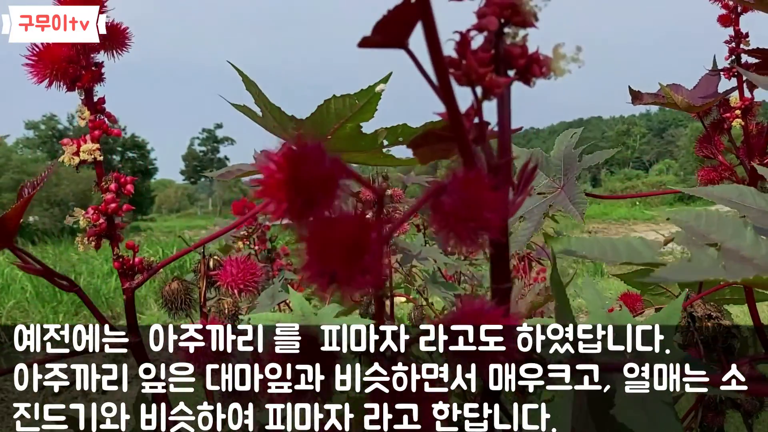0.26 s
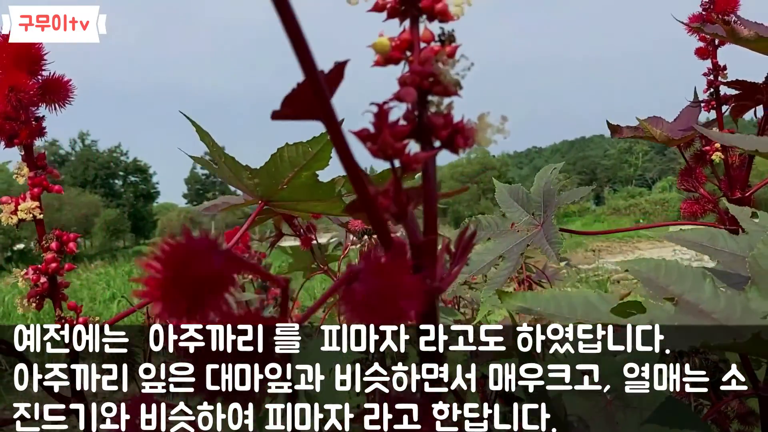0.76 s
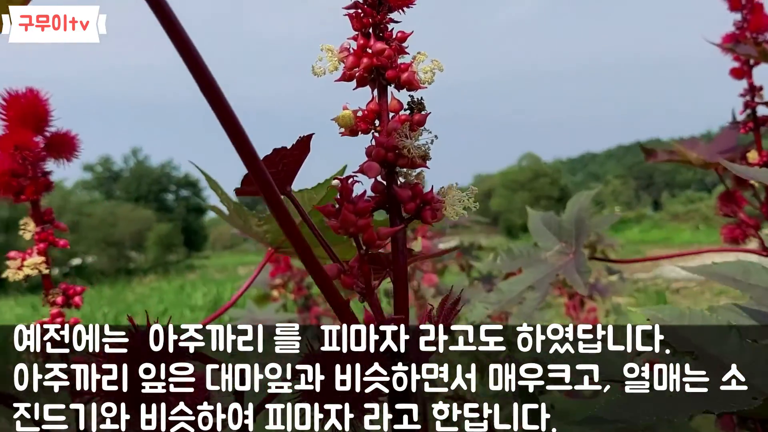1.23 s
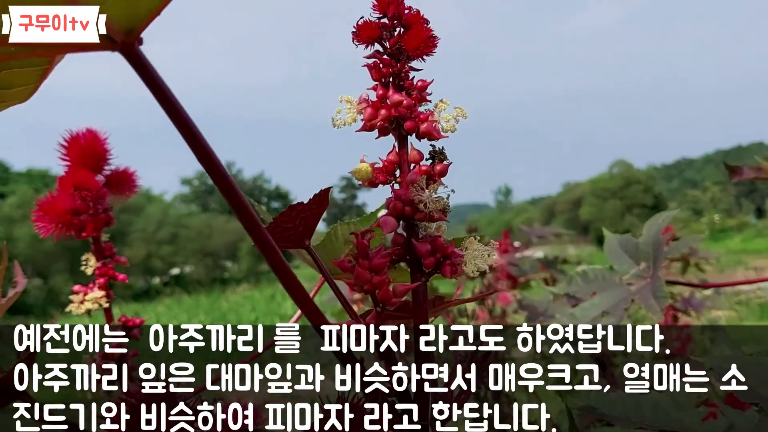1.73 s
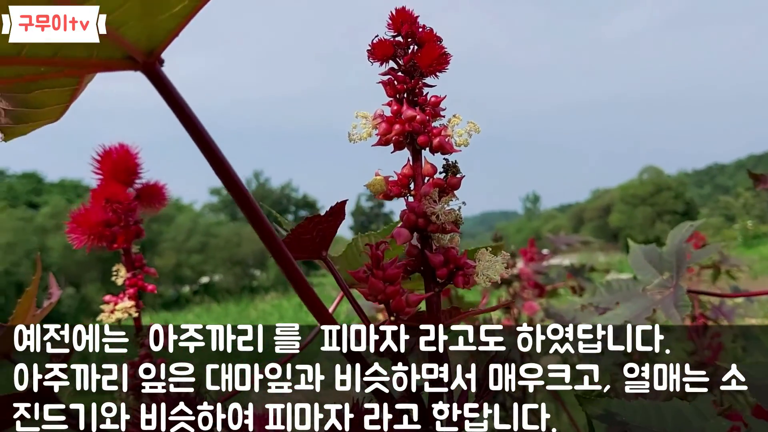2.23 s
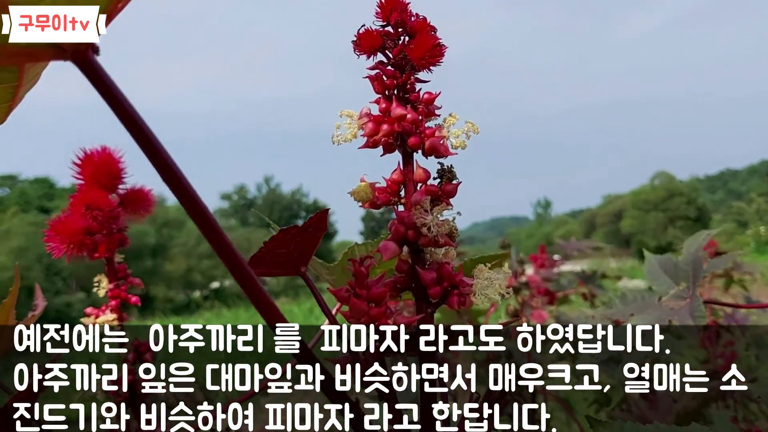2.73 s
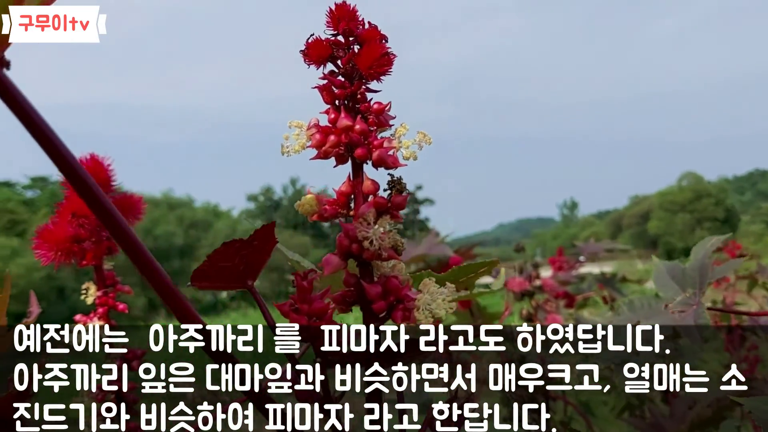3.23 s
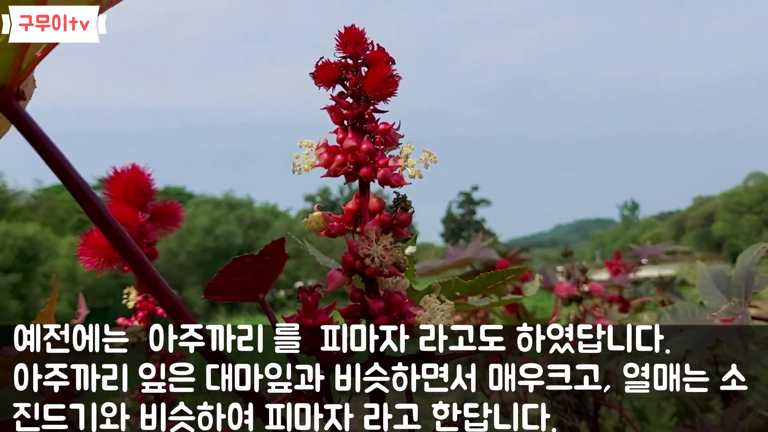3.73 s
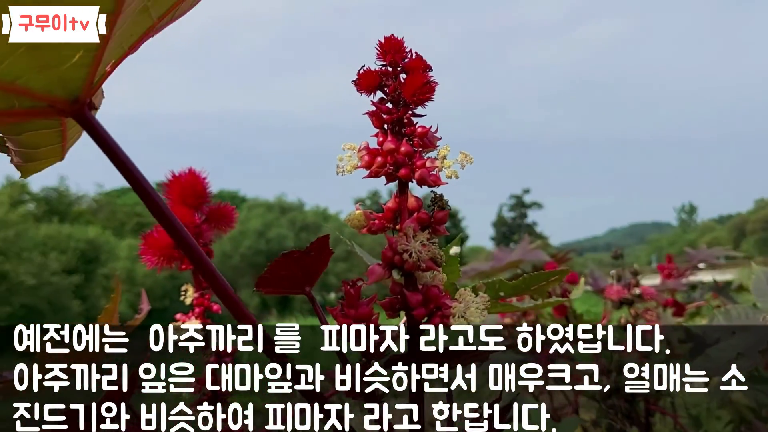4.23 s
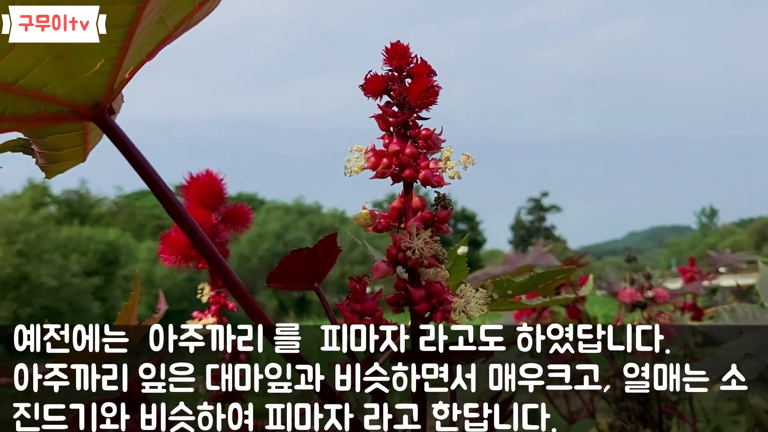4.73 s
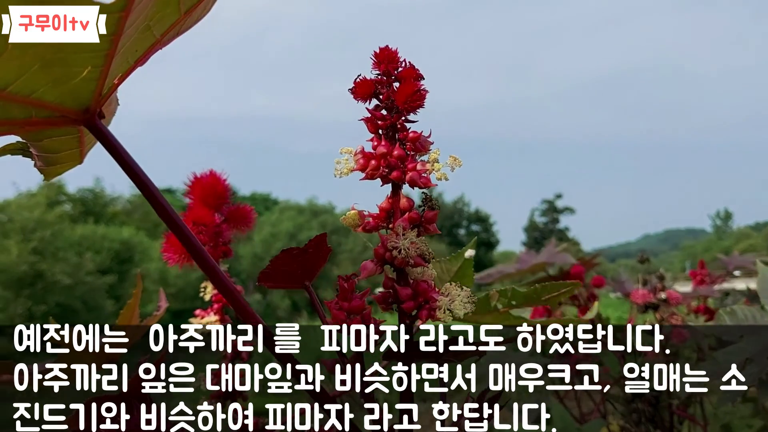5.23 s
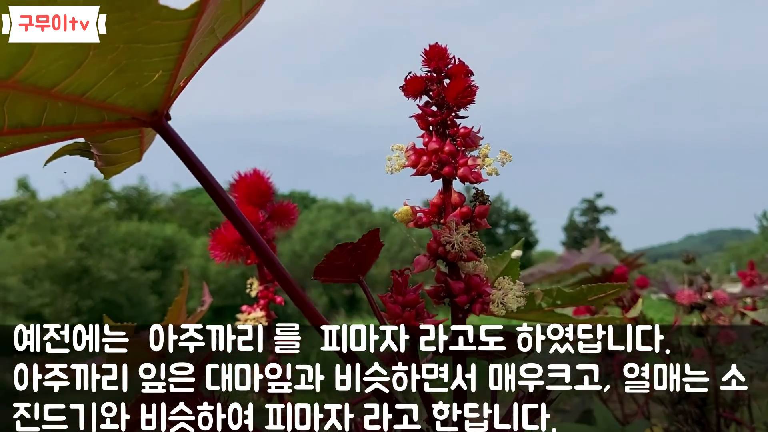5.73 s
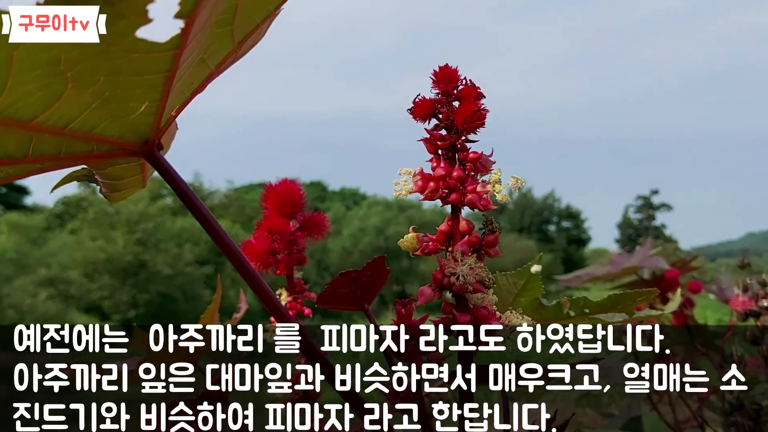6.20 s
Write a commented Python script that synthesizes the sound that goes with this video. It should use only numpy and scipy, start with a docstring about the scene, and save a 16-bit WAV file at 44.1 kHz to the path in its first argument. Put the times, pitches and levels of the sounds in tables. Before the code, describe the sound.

Shrill pulsing insects ring steadily outdoors; a nearby bird slurs thin whistles, rasps one arching screech, then mews nasally with a sharp chip.

```python
"""Songbird in a cricket field

A songbird in the trees gives a long arching screech, slurred whistles, nasal mews and one sharp chip.
Its harsh calls are harmonic series shaped by resonances; gliding tones make whistles and strong mew harmonics.
Crickets are pulsed tones over a blur of shaped noise; a lower trill and a high sizzle are modulated noise.
Behind them lie low-frequency air noise, a faint hum, soft bumps and swells of broadband hiss."""
import sys
import numpy as np
from scipy import signal
from scipy.fft import rfft, irfft, next_fast_len
from scipy.io import wavfile

SR = 44100
rng = np.random.default_rng(int(sys.argv[2]) if len(sys.argv) > 2 else 0)


def transcribe(u):
    """Save the signal u as a 16-bit wav file named by the first command-line argument.

    u: samples, shape (n,) or (channels, n), limited to [-1, 1]; the rate is SR.
    q: integer samples, one column per channel.
    """
    v = np.clip(np.atleast_2d(u).T, -1, 1)
    q = np.round(v * 32767).astype(np.int16)
    wavfile.write(sys.argv[1], SR, q)


N = 284886
TIME = np.arange(N) / SR
EDGE_HZ = 15720  # upper limit of the harmonics and of the final band


def amp(db):
    """Logarithmic level: decibels to amplitude gain."""
    return 10 ** (np.asarray(db) / 20)


def unit(x):
    """Normalisation: scales to rms 1."""
    return x / np.sqrt(np.mean(x ** 2) + 1e-20)


def along(rows, t, axis=1):
    """Linear interpolation: reads one column of a curve at times t."""
    rows = np.asarray(rows)
    return np.interp(t, rows[:, 0], rows[:, axis])


def colour(points, hz):
    """Spectral envelope: gain at hz, interpolated in log frequency and steep beyond its ends."""
    f, db = np.transpose(points)
    octaves = np.log2(hz + 1)
    beyond = abs(octaves - np.clip(octaves, np.log2(f[0]), np.log2(f[-1])))
    slope_db = 59  # per octave outside the curve
    return amp(np.interp(octaves, np.log2(f), db) - slope_db * beyond)


def noise(points):
    """Filtered noise: white noise takes on the given spectrum, at rms 1."""
    size = next_fast_len(N)
    spectrum = rfft(rng.standard_normal(size))
    gain = colour(points, np.fft.rfftfreq(size, 1 / SR))
    return unit(irfft(spectrum * gain, size)[:N])


def wander(rate_hz, size=N):
    """Low-pass noise: smooth chance of about rms 1 that moves up to about rate_hz."""
    padded = next_fast_len(max(size, SR))
    hz = np.fft.rfftfreq(padded, 1 / SR)
    spectrum = rfft(rng.standard_normal(padded)) * np.exp(-.5 * (hz / rate_hz) ** 2)
    return unit(irfft(spectrum, padded))[:size]


def phase(hz):
    """Frequency integration: the running phase of a pitch curve."""
    return 2 * np.pi * np.cumsum(hz) / SR


def add(mix, s, sound):
    """Superposition: mixes a sound in at time s."""
    part = mix[max(round(s * SR), 0):][:len(sound)]
    part += sound[:len(part)]


def slur(length, pitches):
    """Polynomial glide: progress 0-1, and a smooth curve through evenly spaced pitches."""
    u = np.linspace(0, 1, max(round(length * SR), 64))
    steps = np.linspace(0, 1, len(pitches))
    return u, np.polyval(np.polyfit(steps, pitches, len(pitches) - 1), u)


def voice(hz, throat, jitter, flutter, rough_hz, opening=1, count=20):
    """Source and filter: fluttering membrane harmonics; resonances rise as the bill opens."""
    turn = phase(hz * (1 + jitter * wander(rough_hz, len(hz))))
    shake = wander(rough_hz, 2 * len(hz))
    out = np.zeros(len(hz))
    for k in range(1, count + 1):
        strength = colour(throat, k * hz / opening) * (k * hz < EDGE_HZ)
        own_shake = np.roll(shake, rng.integers(len(shake)))[:len(hz)]
        out += strength * (1 + flutter * own_shake) * np.cos(k * turn + rng.uniform(0, 2 * np.pi))
    return unit(out)


def pure(hz, overtone_db=-22, waver=0.0061):
    """Near-sinusoidal oscillation: a slightly wavering tone with a weak octave."""
    turn = phase(hz * (1 + waver * wander(190, len(hz))))
    return unit(np.sin(turn) + amp(overtone_db) * np.sin(2 * turn))


# Resonances of the bird's throat and open bill: (f/Hz, relative level/dB)
THROAT = [(600, -11), (1000, -11), (1400, -15), (1900, -6.5), (2350, -3), (2900, -1), (3300, 4),
          (3620, 6.5), (3900, 0), (4300, -8.5), (5700, -12.5), (6700, -6.5), (7500, -6.5), (8600, -20),
          (11000, -27), (12500, -33)]
# Spectrum of the screech's breathy hiss: (f/Hz, relative level/dB)
SCREECH_HISS = [(1300, -27), (2200, -5), (4800, -5), (7000, 0), (8600, -17), (9300, 1), (11100, 8),
                (12500, -7), (15600, -10)]
# Spectrum of the shrill overtones: (f/Hz, relative level/dB)
SHRILL = [(5600, -25), (6400, 1.5), (6900, 2.5), (7500, -5.5), (8400, -24), (9600, -9), (11000, -11),
          (12200, -12), (14500, -31)]
SCREECH_START_S, SCREECH_END_S = 2.44, 3.3
SCREECH_ATTACK_S, SCREECH_RELEASE_S = 0.073, 0.14
# One arch of effort lifts pitch, voice and hiss together
ARCH_TOP_S, ARCH_HALF_S, ARCH_POWER = 2.82, .42, 1.3
SCREECH_LOW_HZ, SCREECH_TOP_HZ = 641, 939.6
# Levels at the top of the arch, and how much softer each part is at its foot
SCREECH_DB, SCREECH_SWELL_DB = -30, 6.5
HISS_DB, HISS_SWELL_DB = -38.5, 25.5
SHRILL_DB, SHRILL_SWELL_DB = -39, 17.5
FUNDAMENTAL_DB = -67  # the weak lowest partial
# The bill opens with effort and closes late, lowering the resonances (factors on the throat)
BILL_AJAR, BILL_SHUT, BILL_CLOSES_S, BILL_CLOSING_S = 0.9, 0.636, 3.095, 0.029


def screech(split=.03, upper_db=-1, grit_db=-12, bill_hz=1700):
    """Two detuned oscillators: the sides of the syrinx rasp apart in pitch, with effort-driven hiss."""
    t = np.arange(SCREECH_START_S, SCREECH_END_S, 1 / SR)
    arch = np.cos(np.pi / 2 * np.clip((t - ARCH_TOP_S) / ARCH_HALF_S, -1, 1)) ** ARCH_POWER
    hz = SCREECH_LOW_HZ + (SCREECH_TOP_HZ - SCREECH_LOW_HZ) * arch
    closing = .5 + .5 * np.tanh((t - BILL_CLOSES_S) / BILL_CLOSING_S / 2)
    opening = (BILL_AJAR + (1 - BILL_AJAR) * arch) * (1 - (1 - BILL_SHUT) * closing)

    lower = voice(hz * (1 - split), THROAT, jitter=.008, flutter=.6, rough_hz=90, opening=opening)
    upper = voice(hz * (1 + split), THROAT, jitter=.012, flutter=.6, rough_hz=90, opening=opening)
    rasp = lower + amp(upper_db) * upper + amp(grit_db) * noise(THROAT)[:len(t)]
    # so small a bill radiates little bass
    radiation = signal.butter(4, bill_hz, "highpass", fs=SR, output="sos")
    rasp = unit(signal.sosfilt(radiation, rasp))
    rasp = amp(SCREECH_DB - SCREECH_SWELL_DB * (1 - arch)) * rasp

    hiss = amp(HISS_DB - HISS_SWELL_DB * (1 - arch)) * noise(SCREECH_HISS)[:len(t)]
    shrill = voice(hz, SHRILL, jitter=.007, flutter=.8, rough_hz=60)
    shrill = amp(SHRILL_DB - SHRILL_SWELL_DB * (1 - arch)) * shrill
    fundamental = amp(FUNDAMENTAL_DB) * pure(hz, waver=.025)

    attack = np.minimum((t - t[0]) / SCREECH_ATTACK_S, 1)
    release = np.minimum((t[-1] - t) / SCREECH_RELEASE_S, 1) ** 2
    out = np.zeros(N)
    add(out, t[0], (rasp + shrill + hiss + fundamental) * attack * release)
    return out


NOTE_SWELL_DB = 7  # rise over each tone, beneath its fades


def swelling_tone(u, hz, db, flutter_db=2.5):
    """Amplitude envelope: one tone swells, flutters and fades at both ends."""
    swell = amp(NOTE_SWELL_DB * u + flutter_db * wander(50, len(u)))
    return amp(db) * unit(swell * signal.windows.tukey(len(u), .55) * pure(hz))


# Scooping whistles that dip and rise again: (start t/s, length t/s, pitch at mid-note f/Hz, level/dB)
SCOOPS = [(1.363, 0.2, 1830, -58), (4.333, 0.2, 1940, -52), (4.61, .169, 1967, -51.5),
          (6.171, 0.25, 1755, -61)]
# Scoop pitch at even steps: (factor on the mid-note pitch)
SCOOP_GLIDE = [1.2, 1.02, 1, 1.05, 1.23]
# Slurred whistles, one nearly level echoing tail after a note (at 1.55 s), and single strong
# harmonics that stand out of the mews: (start t/s, length t/s, from f/Hz, to f/Hz, level/dB)
GLIDES = [(0.648, 0.17, 1340, 1686, -58.5), (1.04, .177, 1260, 1620, -64.5), (1.066, .031, 3450, 2380, -55),
          (1.461, .095, 3270, 4290, -46), (1.497, .075, 1500, 2550, -56.5), (1.55, .07, 2400, 2390, -58.5),
          (2.261, .022, 2580, 1980, -55.5), (2.314, .062, 1950, 2130, -48.5),
          (3.56, 0.069, 1970, 2300, -62), (4.382, 0.103, 2750, 2650, -61.5), (4.457, .071, 1520, 2530, -56),
          (4.81, .11, 2770, 3340, -51), (5.102, .098, 1386, 1670, -64), (5.354, .087, 1340, 2060, -58),
          (5.561, .097, 1353, 1970, -64), (5.799, .09, 1420, 1930, -63), (6.3, .072, 3140, 3660, -51)]
GLIDE_POWER = 2  # above 1, the pitch moves mostly late in the tone
# One wavering note (start t/s, length t/s, level/dB), and its pitch at even steps (f/Hz)
WARBLE, WARBLE_HZ = (2.06, .113, -52.5), [3220, 2700, 2660, 2910, 3010, 2850, 2450]


def gliding_tones():
    """Frequency modulation: whistles, one warble, and single strong harmonics of the mews."""
    out = np.zeros(N)
    for start, length, middle_hz, db in SCOOPS:
        u, glide = slur(length, SCOOP_GLIDE)
        add(out, start, swelling_tone(u, middle_hz * glide, db))
    for start, length, from_hz, to_hz, db in GLIDES:
        u = np.linspace(0, 1, round(length * SR))
        hz = from_hz + (to_hz - from_hz) * u ** GLIDE_POWER
        add(out, start, swelling_tone(u, hz, db))
    start, length, db = WARBLE
    add(out, start, swelling_tone(*slur(length, WARBLE_HZ), db))
    return out


# The chip drops in, holds, flicks up and fades: (t/s, f/Hz, level/dB)
CHIP = [(5.45, 4070, -52), (5.46, 3264, -33), (5.467, 3210, -30.5), (5.473, 3370, -50),
        (5.486, 3330, -32.5), (5.499, 3320, -32), (5.507, 4150, -42), (5.513, 3410, -42),
        (5.522, 3390, -41), (5.55, 3360, -55)]


def chip():
    """Transient tone: pitch and level follow one brief, sharp contour."""
    t = np.arange(CHIP[0][0], CHIP[-1][0], 1 / SR)
    out = np.zeros(N)
    add(out, t[0], amp(along(CHIP, t, axis=2)) * pure(along(CHIP, t)))
    return out


# Nasal mews: (start t/s, length t/s, pitch f/Hz before the glide, level/dB)
MEWS = [(1.379, 0.26, 471, -53), (2.27, 0.24, 509.5, -50.5), (3.428, 0.24, 513, -65),
        (4.632, 0.36, 397, -49), (4.985, 0.26, 467, -50.5), (5.257, 0.27, 469, -52),
        (5.509, 0.2, 500.6, -51), (5.762, 0.18, 387, -52), (6.025, .221, 483, -54.5),
        (6.201, 0.3, 476, -56)]
# Spectrum of the mews: (f/Hz, relative level/dB)
MEW_COLOUR = [(700, -38), (1400, -3), (2000, 3), (2700, 5.5), (3400, 6.5), (4500, -10), (7000, -10),
              (9500, -16.5), (13000, -27.5), (15500, -24)]
# Mew pitch at start, middle and end: (factor on the pitch)
MEW_GLIDE = [0.95, 0.96, 1.39]


def mews(uneven_db=2, hoarse_db=-3, split=.07, second_db=-4):
    """Inharmonic roughness: two detuned voices and hoarse noise turn upward in pitch at the end."""
    out, rasp = np.zeros(N), noise(MEW_COLOUR)
    for start, length, hz, db in MEWS:
        u, glide = slur(length, MEW_GLIDE)
        pitch = hz * glide
        first = voice(pitch, MEW_COLOUR, jitter=.012, flutter=.8, rough_hz=25, count=30)
        second = voice(pitch * (1 + split), MEW_COLOUR, jitter=.02, flutter=.8, rough_hz=40, count=30)
        tone = unit(first + amp(second_db) * second)
        hoarse = amp(hoarse_db) * np.roll(rasp, -round(start * SR))[:len(u)]
        note = tone * amp(uneven_db * wander(25, len(u))) + hoarse
        add(out, start, amp(db) * unit(note * signal.windows.tukey(len(u), .7)))
    return out


def trees(x, wet_db=-9):
    """Multiple scattering: trunks and foliage return sparse, decaying echoes."""
    t, t60 = np.arange(SR // 2) / SR, .42  # decay time in s
    sparse = (rng.random(len(t)) < .05) * (t > .008)
    taps = rng.standard_normal(len(t)) * sparse * amp(-60 * t / t60)
    return x + amp(wet_db) * signal.fftconvolve(x, taps / np.linalg.norm(taps))[:N]


def cricket(hz, strokes, spread_hz=110, sweep_hz=120):
    """Stridulation: each wing stroke rings a tone that sags a little."""
    stroke = phase(strokes * (1 + .15 * wander(25.0)))
    tone = np.sin(phase(hz + spread_hz * wander(223.8) - sweep_hz * np.sin(stroke)))
    return unit(tone * (1 + np.cos(stroke)) ** 2)


def chirping(rate_hz, depth=0.58):
    """Amplitude modulation: wing strokes swell in loosely timed groups."""
    return 1 + depth * np.sin(phase(rate_hz * (1 + 0.155 * wander(1.77))))


# Spectrum of the blurred chorus: (f/Hz, relative level/dB per Hz)
CHORUS_COLOUR = [(3600, -32), (4150, -21), (4600, -9), (4850, -7), (5100, -9.5), (5450, -12), (5750, -15),
                 (6150, -20.5), (6320, -46)]
# Nearer crickets: (wing tone f/Hz, wing strokes f/Hz, chirps f/Hz, level/dB among themselves)
CRICKETS = [(4804, 70, 4.2, -17.5), (4793, 54, 7.5, -12.5), (5084, 73, 6.9, -8.5), (5665, 28, 16, -15),
            (6070, 36, 15, -32.5)]
# The nearest two keep regular time: (middle of first chirp t/s, period t/s)
CLOCKS = [(.056, .1433), (.13, .1641)]
# Their voices: (wing tone f/Hz, wing strokes f/Hz, level/dB relative to the blur)
LEADS = [(4926, 71, -9), (4740, 55, -10)]
CHORUS_DB, CHORUS_DRIFT_DB = -38.5, 0.71


def chorus(near_db=-6):
    """Incoherent summation: hundreds blur into noise, a few stand out and the nearest two beat time."""
    near = 0
    for hz, strokes, chirps, db in CRICKETS:
        near = near + amp(db) * cricket(hz, strokes) * chirping(chirps)
    leads = 0
    for (first, period), (hz, strokes, db) in zip(CLOCKS, LEADS):
        beat = np.cos(np.pi * (TIME - first) / period) ** 4
        leads = leads + amp(db) * unit(cricket(hz, strokes) * beat)
    blur = unit(noise(CHORUS_COLOUR) * amp(0.77 * wander(60)))
    level = amp(CHORUS_DB + CHORUS_DRIFT_DB * wander(0.48))
    return level * unit(blur + amp(near_db) * unit(near) + leads)


# Spectrum of a lower cricket's trill: (f/Hz, relative level/dB per Hz)
TRILL_COLOUR = [(2800, -42), (3150, -2), (3350, 1), (3600, 8.5), (3850, 4.5), (4150, -13), (4600, -47)]
TRILL_FIRST_S, TRILL_PERIOD_S = .06, .3135  # middle of the first burst, and even spacing
TRILL_DB, TRILL_REST_DB = -50, -6.5  # at the top of a burst, and between bursts relative to it


def trill(strokes_hz=48, depth=0.25, uneven_db=1.3):
    """Nested amplitude modulation: narrow noise pulses within evenly spaced bursts."""
    burst = np.cos(np.pi * (TIME - TRILL_FIRST_S) / TRILL_PERIOD_S) ** 2
    level = TRILL_DB + TRILL_REST_DB * (1 - burst) ** 2 + uneven_db * wander(4)
    pulses = 1 + depth * np.sin(phase(strokes_hz * (1 + 0.179 * wander(11.8))))
    return amp(level) * unit(noise(TRILL_COLOUR) * pulses)


# Spectrum of the bush crickets' sizzle: (f/Hz, relative level/dB per Hz)
SIZZLE = [(5800, -13), (6700, -19.5), (7300, -6.5), (7800, 1.5), (8200, -3), (8700, -18), (9550, -12),
          (10300, -20.5), (11300, -21.5), (12600, -29.5), (15800, -32.5)]
SIZZLE_DB = -52


def sizzle(flicker_db=1.05, swell_db=1.96):
    """Modulated noise: the fine, quick scraping of bush crickets flickers and slowly swells."""
    level_db = flicker_db * wander(160) + swell_db * wander(1.07)
    return amp(SIZZLE_DB) * unit(noise(SIZZLE) * amp(level_db))


# Spectrum of the soft hiss: (f/Hz, relative level/dB per Hz)
HAZE_COLOUR = [(900, -46), (1900, -13), (2550, 2), (3300, 2), (6000, -3), (11000, -16), (15500, -30)]
# Its swells, some a diffuse haze around the bird's calls: (middle t/s, half length t/s, level/dB there)
HAZE_SWELLS = [(.33, 0.34, -48), (1.85, 0.29, -62), (2.8, 0.57, -49.5), (5.5, 0.25, -50),
               (6.25, 0.45, -54.5)]
HAZE_REST_DB = -77


def haze():
    """Noise under an envelope: soft broadband hiss swells in bell shapes over a faint rest level."""
    swell = amp(HAZE_REST_DB)
    for s, half, db in HAZE_SWELLS:
        swell = swell + amp(db) * np.exp(-((TIME - s) / half) ** 2)
    return swell * amp(0.91 * wander(40)) * noise(HAZE_COLOUR)


# Soft bumps on the microphone: (middle t/s, half length t/s, centre f/Hz, level/dB at the middle)
BUMPS = [(0.354, 0.04, 131, -42), (5.554, .035, 60, -47.5), (5.808, 0.045, 70, -49),
         (6.012, 0.023, 158, -42), (6.36, 0.03, 70, -43)]


def bumps():
    """Band-limited impulses: low noise about one pitch under a brief bell-shaped envelope."""
    out = np.zeros(N)
    for s, half, hz, db in BUMPS:
        thud = noise([(hz / 2, -8), (hz, 0), (hz * 2, -12)])
        out += amp(db) * np.exp(-((TIME - s) / half) ** 2) * thud
    return out


# Spectrum of distant rumble and air: (f/Hz, relative level/dB per Hz)
AIR = [(25, -11.5), (54, 1.5), (90, -1.5), (171, -3), (252, -9.5), (319, -8.5), (450, -16), (570, -16.5),
       (800, -22), (1300, -22), (1570, -26), (1870, -37.5), (2500, -27), (3100, -42)]
# The breeze rises and sinks; only its departure from the median counts: (t/s, level/dB)
BREEZE = [(0.0, -52), (0.5, -49.5), (0.65, -52), (1.39, -51.5), (1.83, -55), (2.43, -49), (4.23, -53.5),
          (6.46, -50.5)]
AIR_DB = -50.5


def air(follow=0.66, gust_db=0.72):
    """Broadband noise: distant rumble partly follows the level of the breeze."""
    breeze = along(BREEZE, TIME)
    level_db = AIR_DB + follow * (breeze - np.median(breeze)) + gust_db * wander(3.8)
    return amp(level_db) * noise(AIR)


def hum(hz=58.0, db=-61):
    """Sinusoidal oscillation: a faint low tone drifts slightly in pitch."""
    return amp(db) * np.sqrt(2) * np.sin(phase(hz + 0.81 * wander(2.15)))


# The bass and high treble thin out briefly: (middle t/s, length t/s, depth/dB)
DIPS = [(2.398, .025, 10), (2.61, .02, 5), (2.665, .034, 15), (2.722, .018, 6), (3.047, .018, 8),
        (3.603, .02, 10), (4.257, .016, 9)]


def thin_out(x, low_hz=1600, high_hz=8200):
    """Band splitting: everything outside the middle band dips for a moment."""
    band = signal.butter(6, [low_hz, high_hz], "bandpass", fs=SR, output="sos")
    middle = signal.sosfiltfilt(band, x)
    dip_db = sum(depth * np.exp(-(2 * (TIME - s) / length) ** 4) for s, length, depth in DIPS)
    return middle + amp(-dip_db) * (x - middle)


def scene():
    """Linear superposition: a bird among the trees, insects all around, and the open air."""
    bird = trees(screech() + gliding_tones() + chip() + mews())
    insects = chorus() + trill() + sizzle()
    background = haze() + bumps() + air() + hum()
    return thin_out(bird + insects + background)[None]


def record(dry):
    """Band limitation: a linear-phase low-pass sets the recorder's upper edge."""
    lowpass = signal.firwin(511, EDGE_HZ, window=("kaiser", 9), fs=SR)
    return signal.oaconvolve(dry, lowpass[None], "same")


dry = scene()
out = record(dry)
transcribe(out)
```